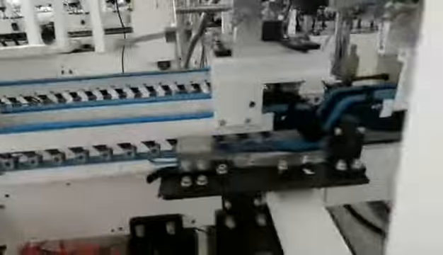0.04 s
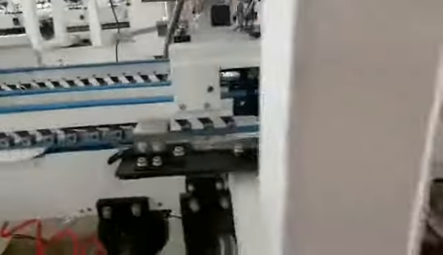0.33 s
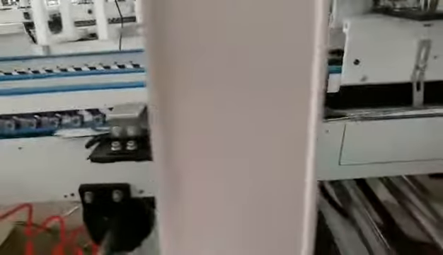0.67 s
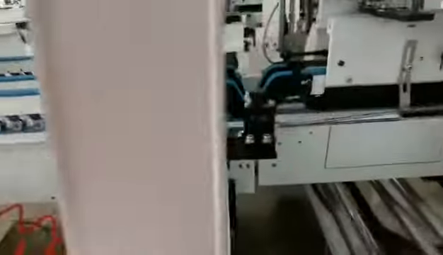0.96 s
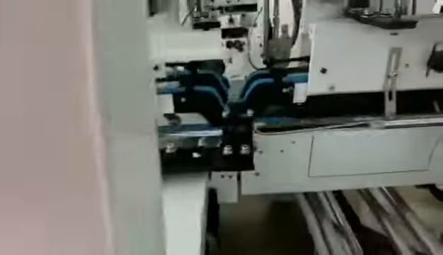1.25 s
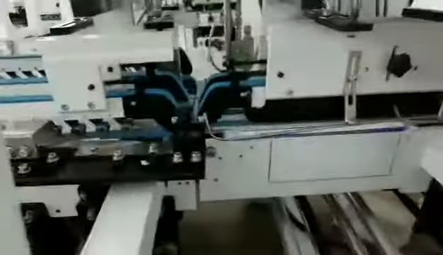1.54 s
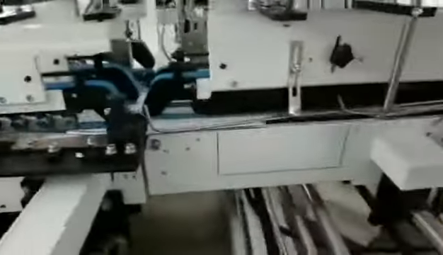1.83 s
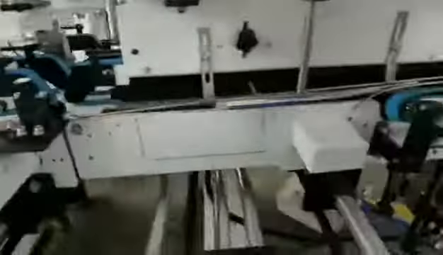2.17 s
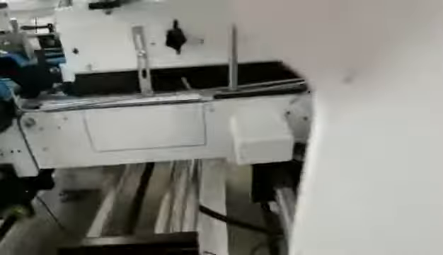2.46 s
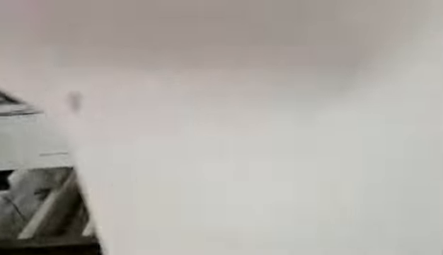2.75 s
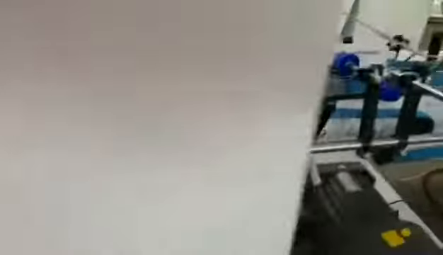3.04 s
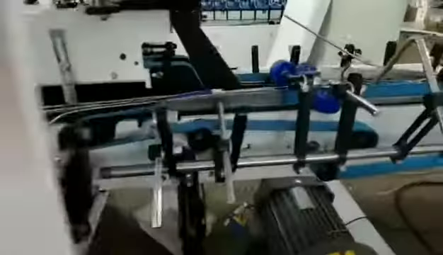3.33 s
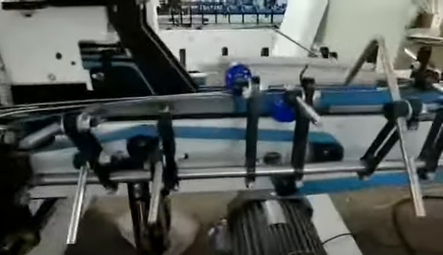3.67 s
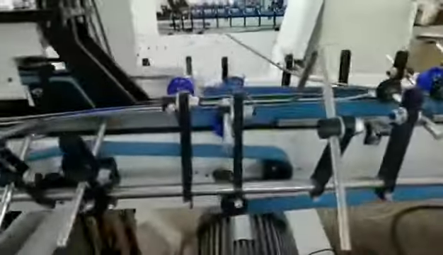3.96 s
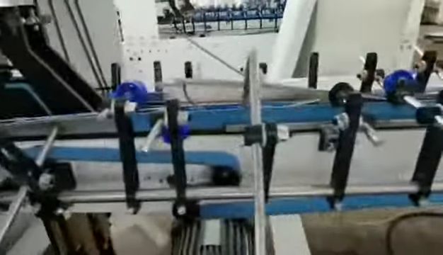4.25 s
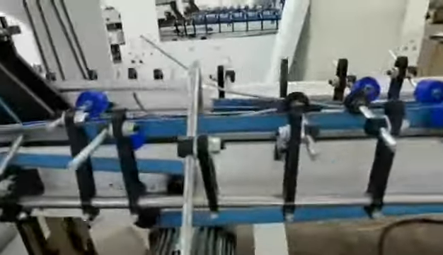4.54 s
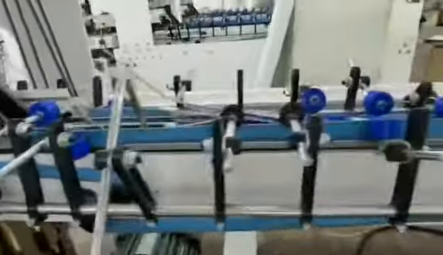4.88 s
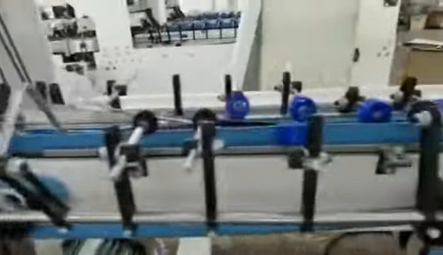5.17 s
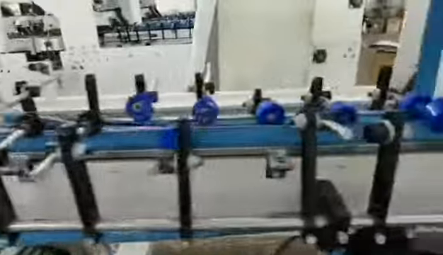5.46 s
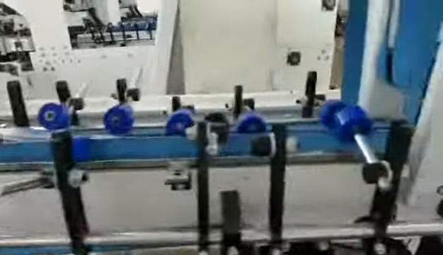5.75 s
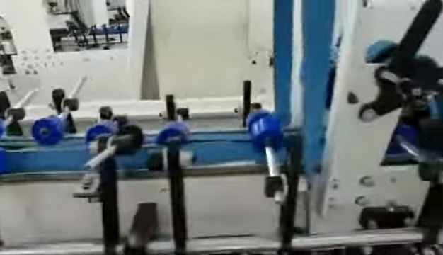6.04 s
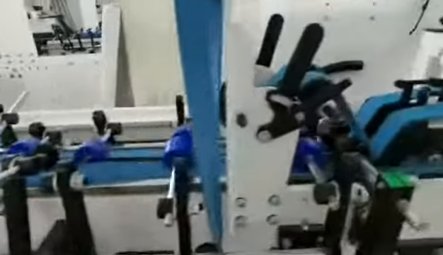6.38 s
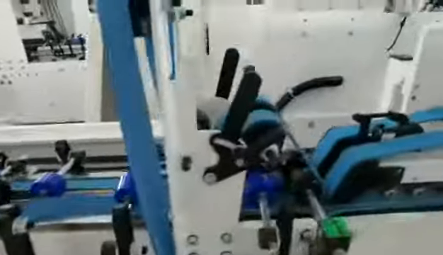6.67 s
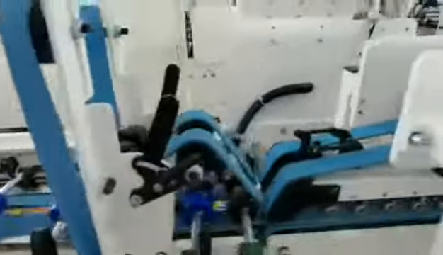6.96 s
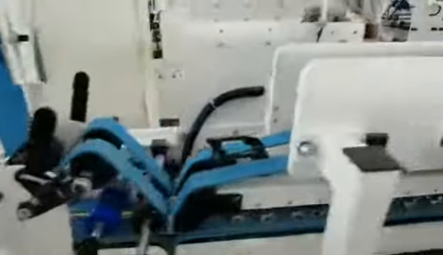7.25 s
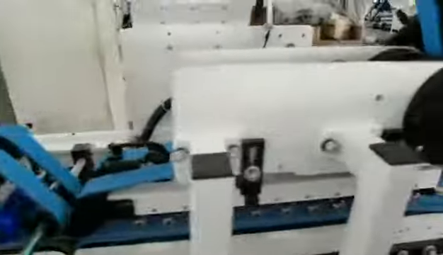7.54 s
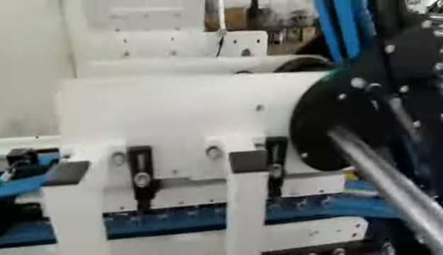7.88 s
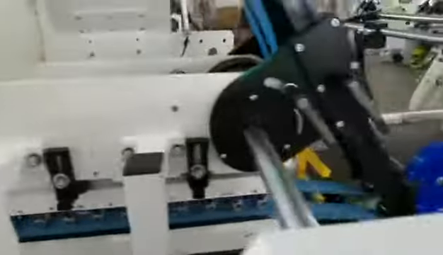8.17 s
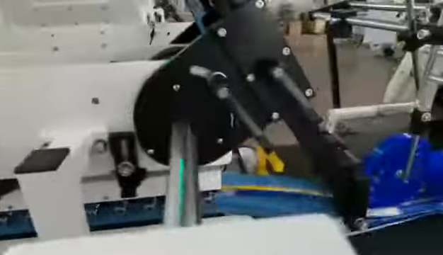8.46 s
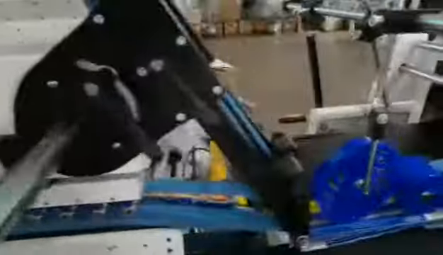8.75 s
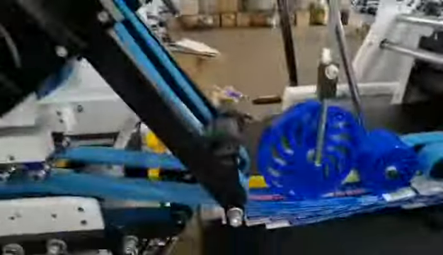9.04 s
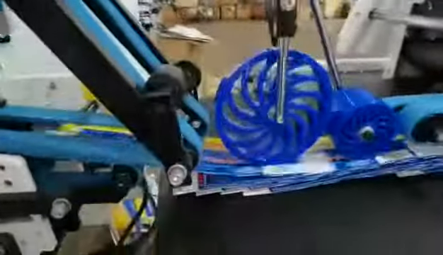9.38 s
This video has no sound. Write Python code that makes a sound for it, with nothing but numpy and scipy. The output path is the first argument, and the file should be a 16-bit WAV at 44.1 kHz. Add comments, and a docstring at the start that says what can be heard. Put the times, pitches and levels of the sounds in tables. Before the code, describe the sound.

Factory machinery drones and clatters steadily, passed at close range, with an early burst of compressed air, light ticks and brief squeaks.

```python
"""A factory hall: a phone is carried along the side of a running folder gluer.
Motors rumble and throb in the frame, belts and rollers rush, card patters and hisses through the
guides, and a bearing sings. Early on one sharp hiss, probably compressed air, bursts out and sets
steel singing. Small ticks, squeals and dull ringing knocks come and go."""
import sys
import numpy as np
from scipy import signal
from scipy.fft import rfft, irfft, next_fast_len
from scipy.io import wavfile
from scipy.ndimage import uniform_filter1d, map_coordinates

SR = 44100
rng = np.random.default_rng(int(sys.argv[2]) if len(sys.argv) > 2 else 0)


def log_audio(samples):
    """Write samples as a 16-bit WAV file to the path given in sys.argv[1]."""
    # one column per channel
    frames = np.atleast_2d(samples).T
    # limit to full scale, then quantise
    limited = np.clip(frames, -1, 1)
    pcm = np.round(limited * 32767).astype(np.int16)
    wavfile.write(sys.argv[1], SR, pcm)


N = 419391
T = np.arange(N) / SR
F = np.maximum(np.fft.rfftfreq(next_fast_len(N, True), 1 / SR), 1)
TOP_HZ, VALVE_SHUTS_S = 7520, 0.753

# Spectrum of the running machine. Each row: frequency in Hz, relative density in dB.
ROAR_SPECTRUM = [(15, -39), (25, -9), (59, 3.5), (189, -1), (319, -1.5), (415, -6), (637, -6.5),
                 (1000, -10.5), (1610, -10), (1770, -8), (2660, -13.5), (3450, -15), (4940, -20.5),
                 (5970, -20), (7400, -11.5), (9620, -43), (16300, -120)]
# How unlike the phone's two ports sound. Each row: frequency in Hz, side minus mid in dB.
STEREO_WIDTH = [(30, -7), (60, -11.5), (140, -14), (300, -12), (550, -9), (900, -3), (1400, 0.5), (2500, 0)]
# Surges of the air valve. Each row: start in seconds, level in dB.
AIR_SURGES = [(0.442, -22), (.503, -22), (.70, -26.5)]


def machine_roar(rumble_db=-38, drone_db=-31.5, rollers_db=-31, end_s=8.1, end_fade_s=.2, end_db=-1.1):
    """Motors, rollers, belts and card: noise bands coloured by the frame, swelling as the phone passes."""
    # Resonances of frame and guards. Each row: centre in Hz, width in Hz, boost in dB.
    frame_modes = [(62, 16, -1.5), (157, 15, 1.5), (221, 24, 2), (282, 16, 0.5), (329, 67, 2.5),
                   (608, 44, 3.5), (760, 89, 3.5), (910, 16, 3), (1150, 70, 1.5), (2910, 110, 2.5),
                   (3430, 320, 4)]
    # Motors shaking the frame, the main drive, and fine hiss near the first guide.
    # Each row: time when nearest in seconds, half-power time in seconds, level in dB.
    motors = [(2.45, .35, -38.5), (4.3, .6, -40), (7.55, 0.27, -37.5), (9.3, .3, -36)]
    main_drive = [(2.45, .35, -33.5)]
    fine_hiss = [(1.9, 0.8, -39)]
    body = colour(ROAR_SPECTRUM) * boosts(frame_modes)

    def band(low_hz, high_hz):
        return diffuse(body * np.sqrt(np.abs(below(high_hz) - below(low_hz))) * (F < TOP_HZ))

    past_end = undb(end_db * (1 + np.tanh((T - end_s) / end_fade_s)) / 2)
    rumble = band(27, 115) * np.hypot(undb(rumble_db), passing(motors)) * undb(.5 * wander(8))
    drone = band(115, 388) * np.hypot(undb(drone_db), passing(main_drive)) * past_end
    rollers = band(382, 1360) * undb(rollers_db + 0.06 * wander(14)) * past_end
    rub = 0.48 * wander(18) + 0.73 * wander(90)  # belts and card rub, so they flutter together
    belt_flutter_db, card_flutter_db = 0.63 * rub, 1.44 * rub
    swish = band(1350, 4070) * belt_gain() * undb(belt_flutter_db)
    card = band(4180, SR) * card_gain() * undb(card_flutter_db)
    sizzle = band(7200, SR) * passing(fine_hiss) * undb(shadow_db() + card_flutter_db)
    return rumble + drone + rollers + swish + card + sizzle


def belt_gain(steady_db=-33, shadow_share=.2):
    """Belts swish all along the machine; the sound mostly bends round the posts."""
    # Belt runs at the folding section and the delivery.
    # Each row: time when nearest in seconds, half-power time in seconds, level in dB.
    belt_runs = [(5.3, 3, -33.5), (9.4, .2, -36.5)]
    return np.hypot(undb(steady_db), passing(belt_runs)) * undb(shadow_share * shadow_db())


def card_gain(steady_db=-42.5):
    """Card hisses all along the machine, loudest at the guides."""
    # Each row: time when nearest in seconds, half-power time in seconds, level in dB.
    guides = [(1.5, 2.1, -37.5), (4.3, 2.04, -38.5)]
    return np.hypot(undb(steady_db), passing(guides)) * undb(shadow_db())


def shadow_db():
    """Treble lost while a post stands between card and phone."""
    # Each row: centre in seconds, half-width in seconds, gain in dB.
    posts = [(.4, .15, -1), (1.0, 0.18, -3), (2.75, 0.53, -5.5)]
    return sum(db * np.exp(-((T - s) / span_s) ** 2) for s, span_s, db in posts)


def shimmer(x, depth_db=3.0, patch_hz=55, patch_s=.04, from_hz=450):
    """Narrow bands swell and sink by chance, separately at each port; the bass stays steady."""
    hz, s, spectrum = signal.stft(x, SR, nperseg=2048)
    grid = np.meshgrid(hz / patch_hz, s / patch_s, indexing="ij")
    patches = rng.standard_normal((2, 1024, 400))
    field = np.array([map_coordinates(port, grid, order=1, mode="nearest") for port in patches])
    treble = (hz ** 2 / (hz ** 2 + from_hz ** 2))[:, None]
    gain = undb(depth_db * unit(field) * treble)
    gain /= np.sqrt(np.mean(gain ** 2, axis=(0, 2), keepdims=True))
    return signal.istft(spectrum * gain, SR)[1][:, :N]


def motor_tones(waver_hz=2.402, throb_db=3.0, throb_per_s=14):
    """Each motor hums on one pitch, throbs, and swells as the phone goes by."""
    # Each row: time when nearest in seconds, half-power time in seconds, pitch in Hz, level in dB.
    motors = [(.45, .35, 255, -37), (1.25, .17, 158, -35), (1.4, .4, 166.6, -39.5), (1.25, .35, 320, -39.5),
              (2.6, .4, 144.3, -38), (2.7, .45, 235.8, -39.5), (3.57, .13, 324, -35), (4.1, .3, 150, -40),
              (4.58, .17, 317, -34.8), (4.95, .11, 328.6, -32.5), (5.7, .35, 154.8, -40),
              (6.15, .3, 332, -39.5), (6.4, .35, 272, -40.5), (7.12, .12, 163, -35),
              (7.52, .17, 166, -34.3), (8.1, .4, 233.8, -42.5)]
    out = np.zeros((2, N))
    for s, span_s, hz, db in motors:
        hum = tone(hz, waver_hz, 6) * unit(undb(throb_db * wander(throb_per_s)))
        nearness = .5 ** (((T - s) / span_s) ** 2 / 2)
        out += hum * undb(db) * nearness
    return out


def card_patter(per_s=110, spread_db=5.5, t60_s=0.032, db=-6, bands=12):
    """Card edges and belt joints tap rollers and guides, which ring briefly; loudest where card hisses."""
    out = np.zeros((2, N))
    slot = 100  # samples per chance of a tap
    for hz in np.geomspace(900, 7200, bands):
        chance, force = rng.random((N // slot, 2)).T
        hits = np.flatnonzero(chance < per_s * slot / bands / SR)
        taps = np.zeros(N)
        taps[hits * slot] = undb(-spread_db * np.log(.05 + force[hits]))
        gain = np.interp(hz, F, colour(ROAR_SPECTRUM))
        out += gain * signal.oaconvolve(taps[None], ring(hz, t60_s, T[:SR // 10]), axes=1)[:, :N]
    return unit(out) * undb(db) * card_gain()


def steel_clatter(per_s=90, t60_s=0.11, spread_db=1.2, db=-3.0, parts=110):
    """Loose steel parts rattle: each light blow rings one at its own pitch, louder at one port."""
    out, age = np.zeros((2, N)), T[:SR // 6]
    part_hz = 900 * 4.0 ** ((np.arange(parts) + rng.random(parts)) / parts)
    decay = np.exp(-np.log(1000) * age / t60_s)
    for when, which, force, left_share, lead_cycles in rng.random((int(per_s * T[-1]), 5)):
        hz = part_hz[int(which * parts)]
        phase = 2 * np.pi * (hz * age + np.array([[0], [lead_cycles]]))
        strength = undb(-spread_db * np.log(0.033 + force)) / hz ** 0.073
        pan = np.sqrt([[left_share], [1 - left_share]])
        add(out, when * T[-1], strength * pan * np.sin(phase) * decay)
    return unit(out) * undb(db) * belt_gain()


def air_burst(rise_s=0.017, sag_t60_s=1.0, tail_t60_s=0.89, sputter_db=1.1):
    """A sputtering jet rings in its outlet; surges rise fast, sag, and die once the valve shuts."""
    # Each row: frequency in Hz, relative density in dB.
    jet_spectrum = [(900, -22.5), (1250, -7), (1500, 0.5), (2600, -2), (3500, -6), (4500, -9), (5700, -8),
                    (7400, -1.5)]
    # Each row: centre in Hz, width in Hz, boost in dB.
    outlet_modes = [(1390, 110, 4.5), (1570, 80, 1), (1770, 45, 3.5), (2550, 90, 3), (2830, 60, 4),
                    (3120, 40, 5), (3300, 100, 4), (3570, 120, 4), (4370, 180, 4)]
    hiss = diffuse(colour(jet_spectrum) * boosts(outlet_modes) * (F < TOP_HZ))
    surges = [undb(db) * ramp(s, rise_s) * fade(s + rise_s, sag_t60_s) for s, db in AIR_SURGES]
    flow = np.linalg.norm(surges, axis=0) * fade(VALVE_SHUTS_S, tail_t60_s)
    return hiss * flow * undb(sputter_db * wander(90))


def steel_ring(waver_hz=16, rattle_db=3, rise_s=0.066, tail_t60_s=.35, sag_t60_s=3.5):
    """The jet rattles the steel's modes, ever more weakly; they ring out when the valve shuts."""
    # Each row: frequency in Hz, level in dB.
    steel_modes = [(1351, -41), (1970, -43), (2541, -41.5), (2848, -42.5), (2939, -41), (3106, -38),
                   (3295, -40), (3564, -38), (3779, -40)]
    opens_s = AIR_SURGES[0][0]
    held = ramp(opens_s, rise_s) * fade(opens_s + rise_s, sag_t60_s) * fade(VALVE_SHUTS_S, tail_t60_s)
    return held * sum(tone(hz, waver_hz, 90) * undb(db + rattle_db * wander(50)) for hz, db in steel_modes)


def jet_whistles():
    """The air jet breaks into brief whistles."""
    # Each row: centre in seconds, half-width in seconds, pitch in Hz, waver in Hz, level in dB.
    whistles = [(.481, .014, 2620, 170, -21.5), (.535, .035, 2540, 10, -28.5), (.53, .022, 3510, 45, -31),
                (.545, .035, 1600, 50, -30), (.628, .012, 3500, 25, -28), (.665, .011, 4220, 200, -25.5)]
    return squeals(whistles)


def bearing_song(tone_db=-3.0, noise_db=-8, flutter_db=2.8):
    """Bearings sing roughly: a wavering tone in a narrow band of noise."""
    # Each row: time when nearest in seconds, half-power time in seconds, relative level in dB.
    bearings = [(.27, .08, -35.5), (.82, .08, -36), (1.35, .42, -36), (5.0, .7, -44.5)]
    song = undb(tone_db) * tone(1782, 13, 40) + undb(noise_db) * resonance(1780, 80)
    return song * passing(bearings) * undb(flutter_db * wander(11))


def ticks(snap_db=-1.5, ring_db=-4.0, t60_s=0.04, tail_db=-15, tail_t60_s=0.26):
    """Ticks near the phone: a hard snap, the part's short ring, a tail from the steel around it."""
    # Each row: start in seconds, level in dB, ring in Hz, relative width, left minus right in dB.
    hits = [(.199, -21, 4306, .15, 0), (.274, -14.5, 7300, .13, 1), (0.662, -13, 3410, 0.29, -1),
            (.736, -16, 7300, 0.11, 2), (1.386, -17, 2200, .4, 1.5), (1.534, -21, 6030, .2, 3),
            (1.726, -18, 7235, .15, 3), (1.828, -24, 6900, .25, 0), (2.039, -18, 3790, 0.3, 2),
            (3.591, -19, 3200, .4, 0), (3.612, -19, 7100, 0.14, 3), (3.851, -20, 6800, .25, 2),
            (3.854, -20, 6800, .25, 2), (3.920, -22, 6630, .2, 6), (3.942, -24, 6550, .2, 6),
            (4.505, -19, 6500, .4, 1), (4.506, -14, 3100, .6, -1), (4.573, -16, 2650, 0.22, -1),
            (4.748, -21, 5254, 0.089, 0), (4.820, -24, 6370, .2, 1), (4.840, -12.5, 3500, .33, -1),
            (4.893, -19, 1100, .6, 0), (5.087, -17, 2200, 0.33, 0), (5.578, -23, 7100, .2, 1),
            (6.396, -18, 1430, 0.62, -5), (6.705, -20, 2700, 0.34, -0.5), (6.913, -15, 2320, .4, 1),
            (7.232, -19, 3210, .3, 2), (8.532, -11.5, 3200, 0.42, -2)]
    out, age = np.zeros((2, N)), T[:SR // 5]
    for s, db, hz, width, pan_db in hits:
        contact = 2 * hz * width * age
        snap = undb(snap_db) * contact * np.exp(1 - contact) * np.sin(2 * np.pi * hz * age)
        part = undb(ring_db) * ring(hz, t60_s, age, width)
        tail = undb(tail_db) * ring(hz, tail_t60_s, age, width)
        add(out, s, (snap + part + tail) * undb(db + np.array([[pan_db], [-pan_db]]) / 2))
    return out


def belt_squeaks():
    """Short rough squeaks, probably of belts."""
    # Each row: centre in seconds, half-width in seconds, pitch in Hz, waver in Hz, level in dB.
    squeaks = [(5.822, .024, 590, 35, -28.5), (5.881, .009, 1205, 50, -21), (5.945, .025, 620, 40, -32.5)]
    return squeals(squeaks)


def belt_slips(rise_s=.01, t60_s=.2, waver=.028, octave_db=-15):
    """Squeals, probably of a slipping belt, catch quickly, bend in pitch and die away in the hall."""
    # Each row: start in seconds, length in seconds, first pitch in Hz, last pitch in Hz, level in dB.
    glides = [(2.848, .04, 675, 640, -25), (2.925, .035, 655, 645, -30.5), (2.99, .17, 660, 825, -39),
              (3.32, .04, 940, 925, -34)]
    out = np.zeros(N)
    for s, length_s, start_hz, end_hz, db in glides:
        hz = np.interp(T, [s, s + length_s], [start_hz, end_hz]) * (1 + waver * wander(150))
        phase = 2 * np.pi * np.cumsum(hz) / SR
        squeal = unit(np.sin(phase) + undb(octave_db) * np.sin(2 * phase))
        out += squeal * undb(db) * ramp(s, rise_s) * fade(s + length_s, t60_s)
    return out


def far_knocks(rise_s=0.0075, trim_db=-2.5, tonal_width_hz=80):
    """Far blows smeared by the hall: one resonance swells and dies, the narrower the purer."""
    # Each row: start in seconds, relative level in dB, pitch in Hz, width in Hz, t60 in seconds.
    blows = [(.708, -27.5, 1400, 600, .25), (.937, -20.5, 1250, 800, 0.38), (.97, -25.5, 675, 500, 1.0),
             (1.04, -22.5, 654, 500, 0.76), (2.225, -18, 263, 70, 0.18), (2.305, -17, 269.6, 70, 0.43),
             (2.831, -26, 225, 60, 0.6), (2.95, -24, 235, 110, .35), (3.745, -25, 1170, 600, .22),
             (5.45, -24.5, 574, 180, 0.56), (5.44, -26.5, 1210, 300, .4), (5.79, -26, 660, 400, 0.9),
             (6.47, -24.5, 286, 120, 0.27), (6.69, -27, 2200, 1300, 0.37), (7.08, -28, 220, 150, 0.37),
             (7.72, -26.5, 603, 400, 1.4), (7.73, -24.5, 1800, 1500, 0.32), (8.52, -26, 199, 120, .25),
             (9.345, -26, 1450, 900, 0.28)]
    out, age = np.zeros((2, N)), T[:SR]
    for s, db, hz, width_hz, t60_s in blows:
        swell = np.minimum(age / rise_s, 1) * np.exp(-np.log(1000) * np.maximum(age - rise_s, 0) / t60_s)
        purity = 1 / (1 + (width_hz / tonal_width_hz) ** 4)
        sine = np.sqrt(2 * purity) * np.sin(2 * np.pi * hz * age)
        noise = np.sqrt(1 - purity) * resonance(hz, width_hz, size=SR)
        add(out, s, (sine + noise) * swell * undb(db + trim_db))
    return out


def roller_hums():
    """Rollers hum in narrow resonances that grow and recede as the phone passes."""
    # Each row: time when nearest in seconds, half-width in seconds, pitch in Hz, width in Hz, level in dB.
    rollers = [(1.8, 0.26, 777, 25, -39), (3.03, 0.1, 672, 110, -36), (3.6, 0.22, 929, 35, -41.5),
               (4.5, 0.66, 1230, 55, -43.5), (5.3, 0.61, 62, 8.7, -39.5), (6.8, .7, 340, 20, -40.5),
               (6.8, 0.69, 440.5, 17, -43), (7.0, 0.9, 2150, 400, -41.5), (6.6, .5, 499, 25, -42.5)]
    return sum(resonance(hz, width_hz) * undb(db) / (1 + ((T - s) / span_s) ** 2 / 2)
               for s, span_s, hz, width_hz, db in rollers)


def gear_whines(drift=.0012, fade_db=3.5):
    """Thin tones of motors and gears fade in and out at each port."""
    # Each row: pitch in Hz, rms level in dB.
    whines = [(2538, -56), (2700, -60), (3100, -57.5), (4698, -61), (5460, -61.5), (6190, -64.5)]
    out = np.zeros((2, N))
    for hz, db in whines:
        phase = 2 * np.pi * np.cumsum(hz * (1 + drift * wander(12))) / SR
        fading = undb(fade_db * np.array([wander(3.3), wander(4.6)]))
        out += undb(db) * unit(np.sin(phase) * fading)
    return out


def squeals(rows, waver_per_s=300):
    """Short tones of unsteady pitch that swell and stop."""
    return sum(tone(hz, waver_hz, waver_per_s) * undb(db) * np.exp(-((T - s) / span_s) ** 2)
               for s, span_s, hz, waver_hz, db in rows)


def tone(hz, waver_hz, per_s):
    """A tone of wavering pitch, rms 1; its phase differs between the ports."""
    phase = 2 * np.pi * np.cumsum(hz + waver_hz * wander(per_s)) / SR
    offset_rad = .7 * np.arctan(np.interp(hz, F, colour(STEREO_WIDTH)))
    return np.sqrt(2) * np.sin(phase + np.array([[-offset_rad], [offset_rad]]))


def ring(hz, t60_s, age, width=0.17):
    """A small part's dense, fading ring at each port; peak 1."""
    sos = signal.butter(2, [hz * (1 - width / 2), hz * (1 + width / 2)], "band", fs=SR, output="sos")
    sound = signal.sosfilt(sos, rng.standard_normal((2, len(age))) * undb(-60 * age / t60_s))
    return sound / np.abs(sound).max()


def resonance(hz, width_hz, size=N):
    """Noise ringing in one resonance, at each port."""
    sos = signal.butter(2, [hz - width_hz / 2, hz + width_hz / 2], "band", fs=SR, output="sos")
    mid, side = signal.sosfilt(sos, rng.standard_normal((2, size)))
    side = side * np.interp(hz, F, colour(STEREO_WIDTH))
    return np.array([mid + side, mid - side]) / np.std(mid)


def diffuse(gain):
    """Coloured noise from all sides: similar bass at both ports, unrelated treble."""
    mid, side = shape(rng.standard_normal((2, N)), gain * np.array([np.ones_like(F), colour(STEREO_WIDTH)]))
    return np.array([mid + side, mid - side]) / np.std(mid)


def passing(rows):
    """Gain of sources walked past: each falls as one over distance, and powers add."""
    return np.sqrt(sum(undb(db) ** 2 / (1 + ((T - s) / span_s) ** 2) for s, span_s, db in rows))


def wander(per_s):
    """Smoothed random steps; rms 1."""
    hold = int(SR / per_s)
    steps = np.repeat(rng.standard_normal(N // hold + 1), hold)
    return unit(uniform_filter1d(uniform_filter1d(steps, hold), hold)[:N])


def ramp(s, rise_s):
    """Linear rise from 0 to 1, starting at time s."""
    return np.clip((T - s) / rise_s, 0, 1)


def fade(s, t60_s):
    """Full level until time s, then exponential decay."""
    return np.exp(-np.log(1000) * np.maximum(T - s, 0) / t60_s)


def colour(points):
    """Gain over F from (Hz, dB) points."""
    hz, db = np.transpose(points)
    return undb(np.interp(np.log(F), np.log(hz), db))


def boosts(modes):
    """Gain over F of bell-shaped resonances."""
    return undb(sum(db / (1 + ((F - hz) / (0.75 * width_hz)) ** 2) for hz, width_hz, db in modes))


def below(hz):
    """Share of power under a soft crossover."""
    return 1 / (1 + (F / hz) ** 8)


def shape(x, gain):
    """Filter by a gain over F."""
    size = next_fast_len(N, True)
    return irfft(rfft(x, size) * gain, size)[..., :N]


def add(out, s, sound):
    """Mix a short sound in at time s."""
    i = int(s * SR)
    out[:, i:i + sound.shape[1]] += sound[:, :N - i]


def undb(db):
    """Decibels to gain."""
    return 10 ** (np.asarray(db) / 20)


def unit(x):
    """Scale to rms 1."""
    return x / np.sqrt(np.mean(x ** 2))


def scene():
    """The machine's roar, tones and impacts."""
    roar = shimmer(machine_roar() + air_burst())
    hums = bearing_song() + gear_whines() + motor_tones() + roller_hums()
    brief_tones = steel_ring() + jet_whistles() + belt_squeaks() + belt_slips()
    impacts = card_patter() + steel_clatter() + ticks() + far_knocks()
    return roar + hums + brief_tones + impacts


def record(dry, right_lag_s=.00008):
    """The right port is muffled and slightly late, so the treble sits left; the top is cut steeply."""
    # Each row: frequency in Hz, left minus right in dB.
    port_balance = [(60, 0), (310, 1), (920, 0.6), (1600, -1), (2800, -2), (3500, -2.5), (4000, 5),
                    (4600, 9.5), (5500, 11), (6500, 25), (7400, 43)]
    power_ratio = colour(port_balance) ** 2
    ports = np.sqrt(2 * np.array([power_ratio, np.ones_like(F)]) / (1 + power_ratio))
    lag = np.exp(-2j * np.pi * F * np.array([[0], [right_lag_s]]))
    top_cut = 1 / np.sqrt(1 + (F / TOP_HZ) ** 300)
    return shape(dry, ports * lag * top_cut)


dry = scene()
out = record(dry)
log_audio(out)
```